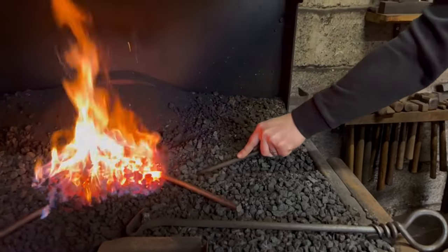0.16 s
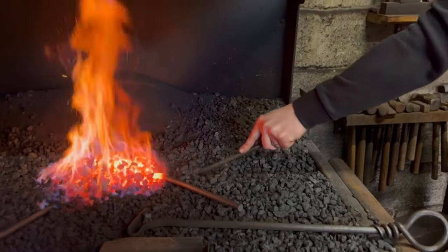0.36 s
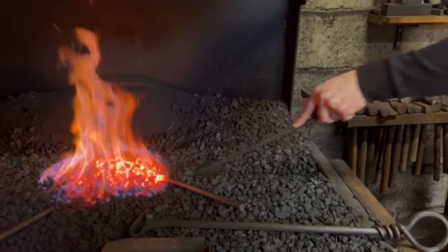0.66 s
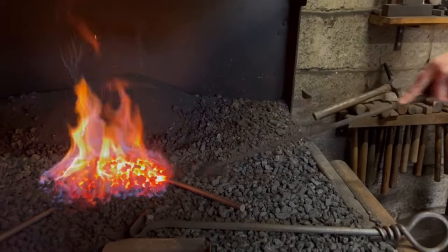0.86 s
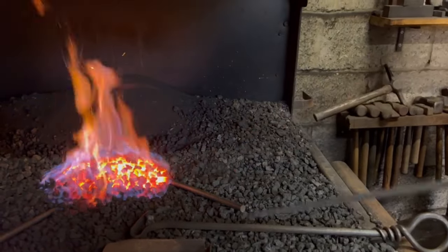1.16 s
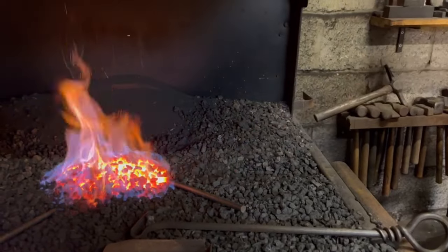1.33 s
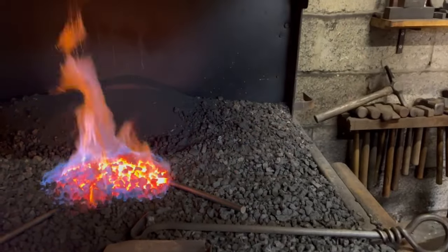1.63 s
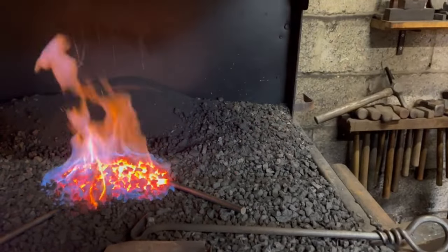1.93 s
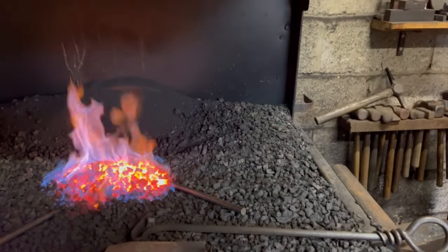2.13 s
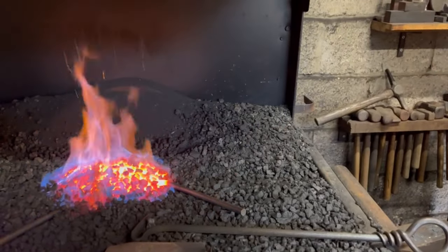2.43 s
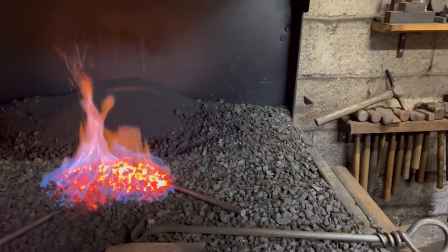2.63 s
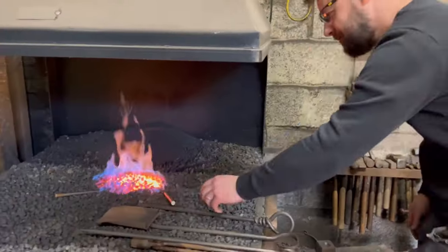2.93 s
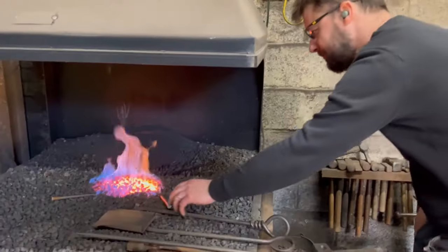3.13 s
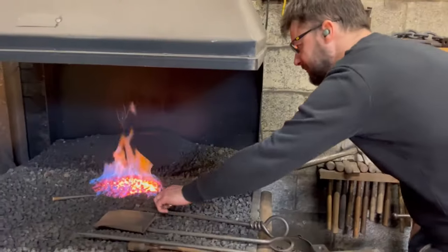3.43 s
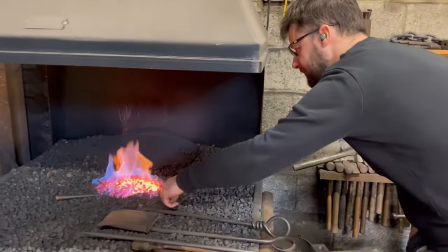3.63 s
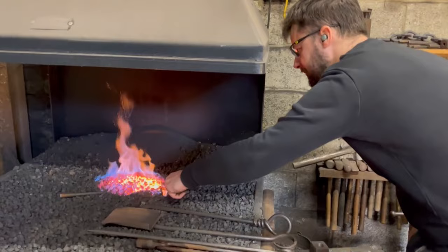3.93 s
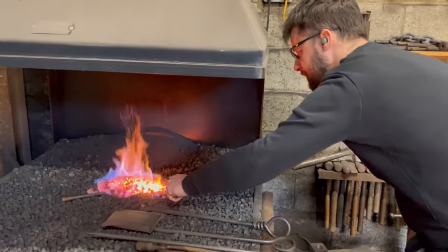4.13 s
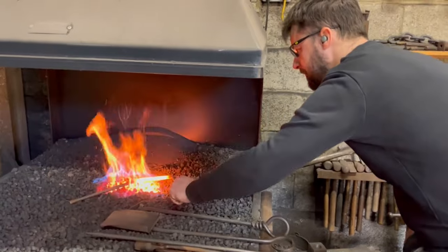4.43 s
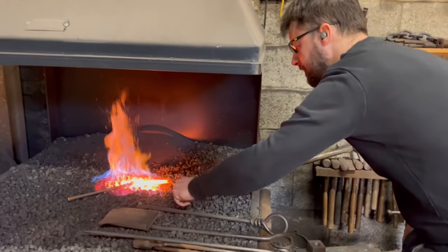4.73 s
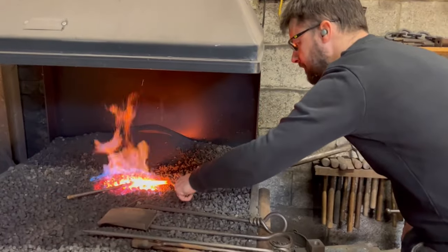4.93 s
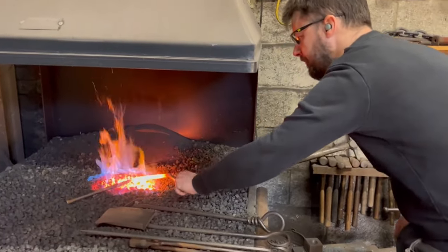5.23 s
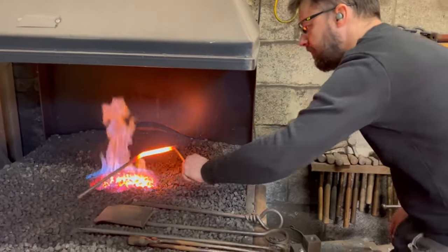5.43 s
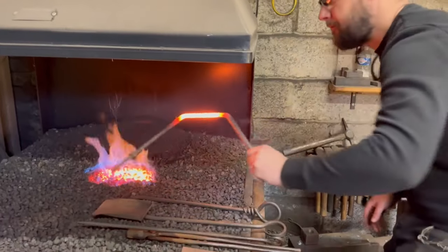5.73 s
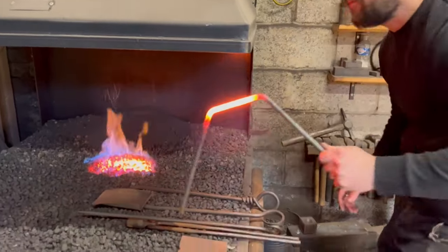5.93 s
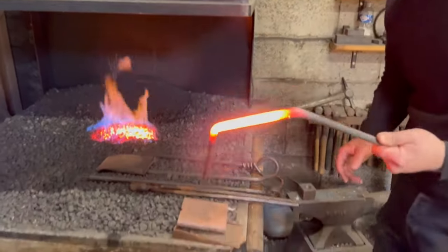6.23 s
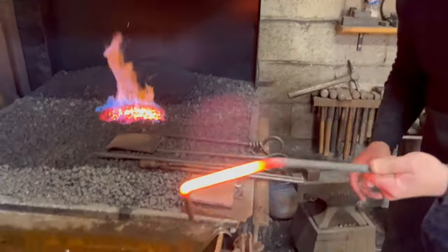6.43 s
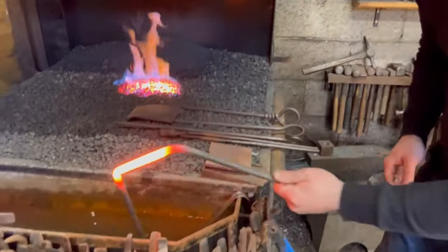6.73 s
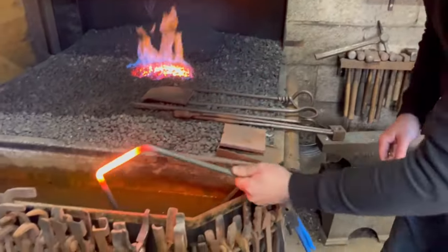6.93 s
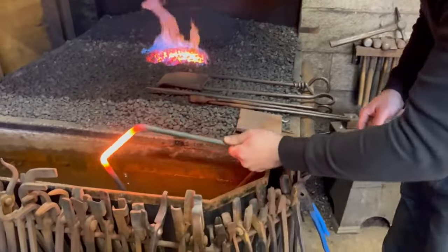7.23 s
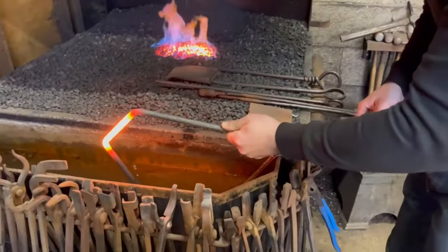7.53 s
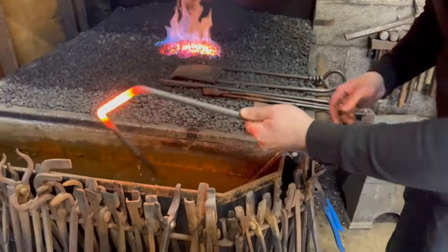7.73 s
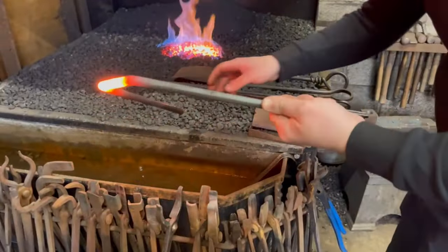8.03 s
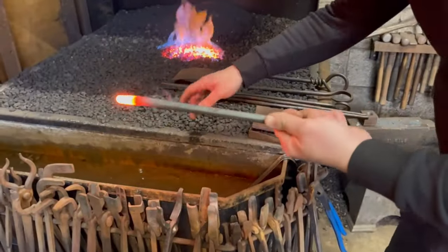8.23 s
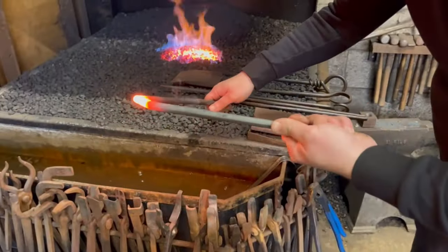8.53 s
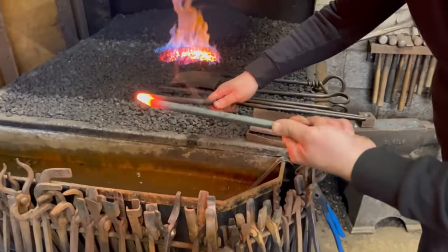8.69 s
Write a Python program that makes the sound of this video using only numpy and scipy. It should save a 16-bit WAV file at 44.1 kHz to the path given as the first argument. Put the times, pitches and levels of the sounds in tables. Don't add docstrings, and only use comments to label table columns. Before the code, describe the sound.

A forge blower runs continuously for nearly nine seconds in a stone workshop, a dense rush of air over low rumble, with a fan hum around 250 Hz that surges and sinks irregularly. The stereo microphone is close to the fire at first. Sharp, dry coal snaps come from 0.3 s, stronger near 0.7, 1.35 and 1.7 s, with short stone echoes. Faint high poker brushes sound at about 0.7 s. At 1.54 s an iron rod clanks onto tools in three very quick blows, bright and ringing, with a low table thump and rattling neighbours, settling at 1.65 s. More snaps follow at 2.3 to 2.8 s. At 2.86 s a tiny dip marks an abrupt step back, the roar changing colour. Around 6.1 to 6.9 s the listener moves to the trough; at 7.07 s tongs knock once, hard and short. The blower continues to the end.

```python
import sys
import numpy as np
from scipy import signal
from scipy.fft import rfft, irfft, next_fast_len
from scipy.io import wavfile
from scipy.ndimage import uniform_filter1d

SR = 44100
rng = np.random.default_rng(int(sys.argv[2]) if len(sys.argv) > 2 else 0)


def ratio_of_db(decibels):
    return 10 ** (np.asarray(decibels, float) / 20)


def generate_wav(sig):
    pcm = np.round(np.clip(np.atleast_2d(sig).T, -1, 1) * 32767).astype(np.int16)
    wavfile.write(sys.argv[1], SR, pcm)


N = 390726

# middle_s, duration_s
MOVES = [
    (2.861, 0.01),
    (6.47, 0.79),
]
# pitch_hz, left_lead_rad
TABLE_LEAD = [(3000, 3.1), (4300, 1.6), (5000, 5.5), (5600, 5.5), (6900, 4.1), (7600, 3.14), (8200, 3.0),
              (9500, .8), (10800, .4), (12100, .1), (13400, -1.1), (14700, -2.3), (16000, -3.0)]
SHAFT_HZ = 49.83
RUN_IN = 44


def evened(x):
    return x / np.sqrt(np.mean(x ** 2) + 1e-20)


def read(points, hz):
    f, *columns = np.transpose(points)
    return np.array([np.interp(np.log(hz + 1), np.log(f + 1), c) for c in columns])


def add(mix, s, sound):
    part = mix[:, round(s * SR):][:, :sound.shape[1]]
    part += sound[:, :part.shape[1]]


def wiggle(count, span):
    once = uniform_filter1d(rng.standard_normal(count), span)
    return evened(uniform_filter1d(once, span))


def places():
    t = np.arange(N) / SR
    a, b = (np.pi / 2 * np.clip((t - s) / duration + .5, 0, 1) for s, duration in MOVES)
    return np.array([np.cos(a), np.sin(a) * np.cos(b), np.sin(a) * np.sin(b)])


def surge_db():
    # peak_s, level_db
    surges = [(0.0, -19.5), (.3, -23), (.49, -37), (.66, -22.5), (1.16, -20.5), (1.65, -34), (2.14, -20),
              (2.49, -22.5), (2.85, -25.5), (3.87, -22.5), (4.25, -22), (4.47, -27.5), (5.45, -24),
              (6.14, -39), (6.39, -24.5), (6.68, -26.5), (7.06, -43), (7.34, -33), (7.55, -23),
              (7.82, -21.5), (7.93, -33), (8.07, -35), (8.49, -26), (8.86, -36)]
    swell_db_per_s, sink_db_per_s, calm_db = 84, 75, -39.5
    s, peak_db = np.transpose(surges)[:, :, None]
    coarse = np.arange(0, N, 64)
    late = coarse / SR - s
    slope = np.where(late < 0, -swell_db_per_s, sink_db_per_s)
    strongest = (peak_db - slope * late).max(0)
    return np.interp(np.arange(N), coarse, np.maximum(strongest, calm_db))


def roar(colour, modes, ports, scatter_rad):
    # pitch_hz, likeness (0-1), left_lead_rad
    treble_ports = [(7500, .5, 3.14), (7900, .78, 3.14), (8500, .8, 3.0), (9000, .55, 2.2), (10200, .5, 1.4),
                    (10600, 1.0, 0.0), (13200, 1.0, 0.0), (13700, .75, -1.2), (14300, .7, -2.5),
                    (14800, .99, -3.14)]
    ripple_depth = .75
    size = next_fast_len(N)
    hz = np.fft.rfftfreq(size, 1 / SR)
    a, b, c, d = rng.standard_normal((4, len(hz)))
    shared_air, own_air = a + 1j * b, c + 1j * d

    same, lead = read(ports + treble_ports, hz)
    same = np.clip(same, 0, 1)
    lead = lead + scatter_rad * wiggle(len(hz), 900) * (hz > 1100) * (hz < 6500)
    left = shared_air * np.exp(1j * lead)
    right = same * shared_air + np.sqrt(1 - same ** 2) * own_air
    z = np.array([left, right])

    lift_db = sum(db / (1 + (2 * (hz - f) / width) ** 2) for f, width, db in modes)
    shared = wiggle(len(hz), 150)
    ripple_db = np.array([2.1 * shared + 0.96 * wiggle(len(hz), 300) for _ in z])
    ripple_db = ripple_depth * ripple_db / (1 + (hz / 5500) ** 4)
    colour_db = read(colour, hz)
    colour_db = np.where(hz < 80, colour_db.mean(0) + [[-.7], [.7]], colour_db)
    low_cut_db = 16.5 * np.log10(1 + (30 / (hz + 1)) ** 3)
    z *= ratio_of_db(colour_db + lift_db + ripple_db - low_cut_db)

    rumble = 1 / (1 + (hz / 560) ** 6)
    hiss = 1 / (1 + (2600 / (hz + 1)) ** 4)
    return [evened(irfft(z * part, size)[:, :N]) for part in (rumble, 1 - rumble - hiss, hiss)]


def air(share, surge):
    # pitch_hz, left_db_per_hz, right_db_per_hz
    roar_fire = [(32, -63, -64), (45.2, -61, -66), (87, -44, -42.5), (241, -43.5, -41), (385, -57, -54.5),
                 (513, -62, -55), (810, -60.5, -56.5), (1020, -63.5, -66), (1880, -65, -62.5),
                 (3300, -71.5, -68.5), (4750, -74.5, -76.5), (7160, -80.5, -78.5), (11000, -89.5, -89),
                 (14800, -100, -94.5)]
    roar_back = [(32, -71.5, -72), (46, -43, -49), (92, -50, -47.5), (223, -43, -40.5), (386, -55, -50.5),
                 (565, -68, -61.5), (750, -60.5, -59), (1210, -59.5, -60.5), (1880, -66.5, -63),
                 (3560, -69, -73), (4500, -69.5, -73), (7950, -84.5, -83.5), (11000, -93.5, -85.5),
                 (14700, -96, -94.5)]
    roar_trough = [(32, -75, -77), (45, -56, -58), (64, -57, -57), (91, -55, -53), (247, -46, -43.5),
                   (394, -58, -53.5), (506, -64, -59), (820, -62, -57.5), (1050, -62.5, -62.5),
                   (2100, -67, -62.5), (3630, -67.5, -73), (5200, -75, -77), (7500, -85.5, -85),
                   (11000, -90.5, -85.5), (14500, -101, -94)]
    # pitch_hz, width_hz, lift_db (negative for a dip)
    bumps_fire = [(46, 17, 18), (68, 20, 0), (124, 16, -5), (166, 13, -0.5), (340, 27, -1.5), (773, 41, -4),
                  (1125, 63, 2.5), (1420, 110, 1.5), (560, 38, -5), (1020, 50, -2), (88, 28, 6),
                  (175, 12, 2.5), (224, 65, 3.5), (383, 53, 12), (423, 21, 4.5), (554, 18, 7),
                  (955, 140, 10.5), (1150, 29, 8.5), (1374, 87, 6.5), (272, 71, -4), (127, 120, -2.5),
                  (504, 30, -10.5), (1170, 65, -2), (3040, 410, -2.5), (7600, 820, -11)]
    bumps_back = [(50.3, 15, -1), (91.5, 13, 2), (152, 12, 1.5), (210, 8.6, 1.5), (273, 54, 5.5),
                  (338, 36, 6.5), (376.6, 22, 5.5), (644, 40, 2.5), (60, 15, -3), (111, 14, 4),
                  (132, 15, -3), (221, 23, 4), (257, 9.9, -2.5), (376, 22, 4.5), (1058, 110, -4.5),
                  (1730, 92, -1), (3030, 300, 0.5), (174, 12, 3.5), (2110, 180, 1), (764, 29, 5.5),
                  (1650, 110, 2), (2438, 81, 7.5), (2920, 73, 3.5), (1340, 100, 0.5), (3750, 220, 3.5),
                  (5300, 230, 0), (2300, 200, -2.9), (5600, 720, -1), (173, 17, -7), (128, 19, 2),
                  (434, 51, -1.5), (327, 9.9, -9)]
    bumps_trough = [(50.3, 18, 0), (62, 25, -3), (103, 24, 1.5), (216, 25, 4), (440, 50, -3), (850, 60, -3),
                    (950, 90, 6), (810, 40, -3), (190, 15, -3), (154, 9.4, 5.5), (170, 14, -2), (211, 47, 5),
                    (301, 19, 3.5), (400, 27, -1), (546, 14, 2.5), (907, 85, 8), (1394, 180, 3),
                    (1785, 55, 7), (2420, 63, 3), (175, 9, -5), (126, 15, -2), (452, 28, -14), (352, 42, -1),
                    (1200, 150, -1.5), (5270, 200, 2), (6560, 670, 2.5), (2300, 180, -1.5), (1450, 150, -2)]
    # pitch_hz, likeness (0-1), left_lead_rad
    ports_fire = [(40, .998, -.12), (120, .99, -.25), (300, .94, -.8), (420, .84, -1.0), (590, .2, 0.1),
                  (660, .7, 2.5), (1000, .75, 1.7), (1150, .4, 1.9), (1450, .45, 2.2), (1700, .55, 3.4),
                  (2100, .55, 3.5), (2500, .35, 3.1), (4200, .35, 2.5), (5500, .25, 3.1), (6900, .25, 3.1)]
    ports_far = [(40, .998, -.12), (120, .99, -.25), (300, .94, -.6), (420, .84, -1.0), (590, .2, 0.1),
                 (680, .7, 1.8), (950, .8, 1.6), (1300, .45, .9), (2300, .5, 0.1), (3300, .35, 2.0),
                 (4200, .35, .7), (5500, .25, 3.1), (6900, .25, 3.1)]
    # rumble_db, rush_db, hiss_db
    air_levels = [
        (-22, -25, -34),
        (-22.5, -28.5, -36),
        (-21.5, -29.5, -35.5),
    ]
    # time_s, rush_db
    nearness = [(0, -5), (2.85, -5.5), (2.9, -2.4), (3.7, -3), (4.6, -1), (5.7, -1), (6.4, -0.5), (6.9, -1),
                (7.8, -0.5), (8.86, 0)]
    follow = (0.036, 0.044, .02)
    hiss_near = 0.16

    gust_db = 0.93 * wiggle(N, 1200)
    near_db = np.interp(np.arange(N) / SR, *np.transpose(nearness))
    lifts_db = (0, gust_db + near_db, gust_db + hiss_near * near_db)
    swell_db = surge - surge.mean()
    gains = [ratio_of_db(k * swell_db + lift_db) for k, lift_db in zip(follow, lifts_db)]
    spots = [(roar_fire, bumps_fire, ports_fire, .4),
             (roar_back, bumps_back, ports_far, .8),
             (roar_trough, bumps_trough, ports_far, .8)]
    out = np.zeros((2, N))
    for part, spot, levels_db in zip(share, spots, air_levels):
        layers = roar(*spot)
        out += part * sum(gain * ratio_of_db(db) * layer for gain, db, layer in zip(gains, levels_db, layers))
    return out


def drift(x):
    depth_db, width_hz, duration_s = 1.4, 120, .5
    hz, t, z = signal.stft(x, SR, nperseg=1024)
    field = rng.standard_normal((len(t), len(hz)))
    for span, axis in ((duration_s * SR / 512, 0), (width_hz * 1024 / SR, 1)) * 2:
        field = uniform_filter1d(field, max(round(span), 1), axis)
    reach_db = depth_db / (1 + (500 / (hz + 1)) ** 4) / (1 + (hz / 6000) ** 4)
    return signal.istft(z * ratio_of_db(evened(field) * reach_db).T, SR, nperseg=1024)[1][:, :N]


def fan(share, surge):
    # multiple, fire_db, back_db, trough_db
    orders = [(2, -35, -40, -45), (3, -46, -46, -52), (6, -40, -33.5, -33), (15, -45.5, -45, -53)]
    blades, wander_hz, waver_hz = 5, 1.52, 9
    steady, pan_db = 0.16, -6.5
    t = np.arange(N) / SR
    blade_hz = blades * SHAFT_HZ + wander_hz * wiggle(N, 3000)
    out = np.sqrt(2) * ratio_of_db(surge - 2.5) * np.sin(2 * np.pi * np.cumsum(blade_hz) / SR)
    span = round(SR / waver_hz / 2)
    for k, *place_db in orders:
        chance = wiggle(N, span) + 1j * wiggle(N, span)
        waver = steady + np.sqrt(.5 * (1 - steady ** 2)) * chance
        level = np.sqrt(2 * ratio_of_db(place_db) ** 2 @ share ** 2)
        out += level * (waver * np.exp(2j * np.pi * k * SHAFT_HZ * t)).real
    return out * ratio_of_db(np.array([[.5], [-.5]]) * pan_db)


def crack(hz, tail_db, lead, width=1.1, t60=.045, grit=.6, grit_s=.00015):
    wall_s = .006
    top_hz, dull_hz = 16000, 14200
    t, f = np.arange(3000) / SR, np.fft.rfftfreq(3000, 1 / SR)
    burst = rng.standard_normal((2, len(t)))
    snap = 3.5 * (t == 0) + grit * burst * np.exp(-t / grit_s)
    scattered = 1.8 * burst[1] + burst
    echoes = ratio_of_db(tail_db - 60 * t / t60) * scattered * np.clip(t / wall_s, 0, 1) ** 2
    edges = np.clip([hz / (1 + width), hz * (1 + width)], 500, 15700)
    x = signal.sosfilt(signal.butter(2, edges, "bandpass", fs=SR, output="sos"), snap + echoes)
    turn = np.array([[1], [0]]) * read(lead, f) - 2 * np.pi * f * RUN_IN / SR
    x = irfft(rfft(x) * np.exp(1j * turn) * (f < top_hz) / (1 + (f / dull_hz) ** 8), 3000)
    x = x * np.clip((t * SR - RUN_IN + 16) / 10, 0, 1)
    return x / abs(x).max()


def coals():
    # start_s, peak_db, left_right_db, centre_hz, tail_db
    coal_cracks = [(.266, -17, 2, 11500, -16), (.3214, -25, -.6, 11000, -14), (0.503, -13, 6, 9000, -23),
                   (.6287, -19, 3, 10500, -8), (0.6722, -8, 1, 10000, -17), (.680, -27, 0, 12500, -8),
                   (1.195, -16, 5, 8000, -18), (1.3473, -8.5, 0, 8000, -27), (1.3737, -8, -11, 6460, -16),
                   (1.4573, -26, 0, 19000, -12), (1.4615, -27, 0, 19000, -12), (1.653, -24, 0, 10000, 0),
                   (1.7237, -9, -2, 6000, -14), (1.729, -19, 2, 7000, -10), (2.338, -27, -.6, 4500, -14),
                   (2.564, -10.5, 10, 8000, -14), (2.7265, -18, -.6, 8000, -14),
                   (2.756, -35, -7, 9000, -15), (2.864, -30, -2, 13000, -8)]
    # pitch_hz, left_lead_rad
    near_lead = [(3000, 3.1), (7600, 3.14), (8200, 2.9), (9500, 1.9), (10800, .5), (12100, 0.0),
                 (13400, -.9), (14700, -1.9), (16000, -2.3)]
    out = np.zeros((2, N))
    for s, db, pan_db, hz, tail_db in coal_cracks:
        sides = ratio_of_db(db + np.array([[.5], [-.5]]) * pan_db)
        add(out, s - RUN_IN / SR, crack(hz, tail_db, near_lead) * sides)
    return out


def strike(body_hz, body, blows, lead=TABLE_LEAD):
    chatter, chatter_s = .7, .003
    grip_s, grip_db_per_s = 0.063, 293
    out, t, hz = np.zeros((2, N)), np.arange(12000) / SR, np.array(body_hz)[:, None]
    *side_db, t60 = np.transpose(body)[:, :, None]
    phase, stray = rng.random((2, len(hz), 1))
    left_phase = phase + read(lead, hz)[0] / (2 * np.pi) + .06 * (stray - .5)
    phase = np.array([left_phase, phase])
    for s, db, crack_db, damping, crack_hz in blows:
        rattle = np.array([1 + chatter * wiggle(len(t), round(chatter_s * SR)) for _ in hz])
        rattle = rattle / np.hypot(1, chatter)
        decay_db = 60 * t * damping / t60 + grip_db_per_s * hz / 9000 * np.maximum(t - grip_s, 0)
        level = ratio_of_db(db - 1.5 + np.array(side_db) - decay_db)
        swing = np.sin(2 * np.pi * (hz * (t + round(s * SR) / SR) + phase))
        add(out, s, (rattle * level * swing).sum(1) * np.clip(t / 0.0004, 0, 1))
        snap = crack(crack_hz, -20, lead, width=.9, t60=.08, grit=1.8, grit_s=.0015)
        add(out, s - RUN_IN / SR, ratio_of_db(crack_db) * snap)
    return out


def poker():
    poker_hz = [11145, 12650, 13800, 14475]
    # left_db, right_db, t60_s
    poker_modes = [(5, 4, 0.1), (-5, -5, .15), (-9, -8, .25), (-4, -3, 0.19)]
    # start_s, ring_db, crack_db, damping (factor), crack_hz
    touches = [
        (.674, -44, -28, 1.05, 11000),
        (.700, -40, -32, 1.3, 11000),
        (1.470, -43, -45, 0.59, 11000),
    ]
    squeak = [
        (.652, -45, -50, .8, 14000),
    ]
    return strike(poker_hz, poker_modes, touches) + strike(poker_hz[-1:], poker_modes[-1:], squeak)


def tongs():
    tongs_hz = [3400, 3890, 4210, 2050, 5590, 5873, 9170, 9565, 10088, 10344, 11006, 12570]
    # left_db, right_db, t60_s
    tongs_modes = [(16, 13, 0.04), (14, 10, 0.03), (12, 2, 0.07), (9, 8, .06), (-1, 4, 0.2), (-4, -3, .15),
                   (-10, -11, .05), (-14, -13, .3), (-9, -10, 0.27), (-13, -12, 0.5), (-4, -4, .12),
                   (-18, -18, .6)]
    # start_s, ring_db, crack_db, damping (factor), crack_hz
    knock = [
        (7.0722, -32.5, -13, 1.05, 4000),
    ]
    # pitch_hz, left_lead_rad
    trough_lead = [(3000, .5), (4300, .6), (5600, 2.1), (6900, 4.7), (8200, 2.1), (9500, 1.6), (10800, .2),
                   (12100, -.3), (16000, -3.1)]
    return strike(tongs_hz, tongs_modes, knock, trough_lead)


def table_thump():
    t = np.arange(4000) / SR
    hz = np.array([[620], [980], [1370]])
    thump = ratio_of_db(-27 - 60 * t / 0.1) * np.sin(2 * np.pi * hz * t).sum(0)
    out = np.zeros((2, N))
    add(out, 1.5500, thump * np.ones((2, 1)))
    return out


def rod_accents():
    # left_db, right_db, t60_s
    second_hz = [2750, 2950, 4500, 5290]
    second_modes = [(0, 3, .06), (-3, 0, .05), (-5, -8, .15), (3, -3, .09)]
    third_hz = [4540, 5665, 6667, 7038]
    third_modes = [(-6, -9, .15), (-9, -2, .2), (-1, -9, .12), (2, -1, .14)]
    # start_s, ring_db, crack_db, damping (factor), crack_hz
    second_hit = [
        (1.5496, -27, -20, 1.0, 3900),
    ]
    third_hit = [
        (1.5725, -27, -22, 1.0, 3900),
    ]
    # pitch_hz, left_lead_rad
    accent_lead = [(2500, 1.2), (4500, 1.6), (5300, .6), (7100, .9)]
    return strike(second_hz, second_modes, second_hit, accent_lead) + strike(third_hz, third_modes, third_hit, accent_lead)


def settling():
    rest_hz = [3575, 5241, 5666, 5943, 6142, 7136]
    # left_db, right_db, t60_s
    rest_modes = [(-4, -2, 0.4), (-10, -10, 0.2), (-16, -6, .2), (-3, -5, 0.1), (-5, -7, .08),
                  (-9, -7, .15)]
    # start_s, ring_db, crack_db, damping (factor), crack_hz
    settle = [
        (1.651, -24, -19, 1.2, 6000),
    ]
    return strike(rest_hz, rest_modes, settle)


def rod():
    rod_hz = [2710, 2794, 3080, 3165, 3300, 3575, 3770, 4130, 4412, 4538, 4936, 5237, 5295, 5488, 5665,
              5950, 6667, 6770, 7038, 7626, 8041, 8655, 8864, 9666, 10431, 11075, 11140, 11266, 12657,
              13545, 14474]
    # left_db, right_db, t60_s
    rod_modes = [(-3, 0, 0.14), (-9, -5, 0.13), (-23, -15, .5), (-14, -3, 0.53), (4, 10, 0.05),
                 (-5, -22, .8), (-14, -16, .4), (-16, -18, .4), (-3, -13, 0.23), (-13, -19, .5),
                 (-17, -16, .4), (-4, 2, 0.24), (0, 0, 0.12), (4, -7, 0.08), (-18, -8, 0.88), (6, 0, 0.065),
                 (-4, -7, 0.2), (-5, -7, .4), (-4, -5, 0.23), (5, 3, 0.18), (-9, -10, .5), (-5, -1, .3),
                 (-8, -4, 0.22), (-19, -7, .25), (0, 2, 0.24), (-4, -8, 0.3), (-15, -15, .3), (0, 1, 0.2),
                 (-15, -15, .8), (-17, -18, .3), (-25, -23, .6)]
    # start_s, ring_db, crack_db, damping (factor), crack_hz
    rod_blows = [
        (1.5374, -25.5, -5, 0.63, 7000),
        (1.5500, -31, -10, 0.62, 3200),
        (1.577, -34, -17, .8, 6000),
    ]
    return strike(rod_hz, rod_modes, rod_blows)


def scene():
    share, surge = places(), surge_db()
    blower = drift(air(share, surge)) + fan(share, surge)
    iron = poker() + tongs() + table_thump() + rod_accents() + settling() + rod()
    return blower + coals() + iron


def top_cut(x):
    return signal.sosfilt(signal.butter(12, 15690, fs=SR, output="sos"), x)


def record(dry):
    t = np.arange(N) / SR
    dip = 1 - 0.9 * np.exp(-((t - MOVES[0][0]) / 0.002) ** 2)
    fade_in = np.clip(np.arange(N) / 100, 0, 1)
    return top_cut(dry * dip * fade_in)


dry = scene()
out = record(dry)
generate_wav(out)
```